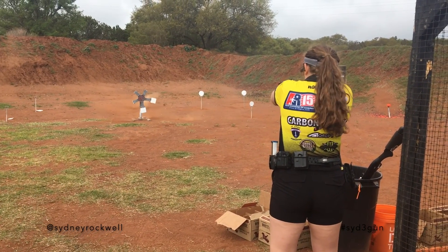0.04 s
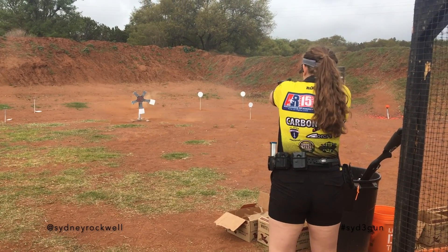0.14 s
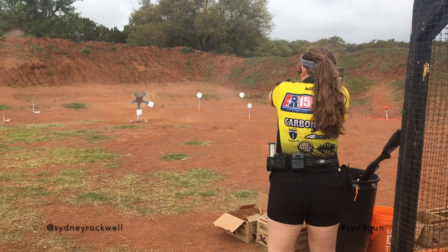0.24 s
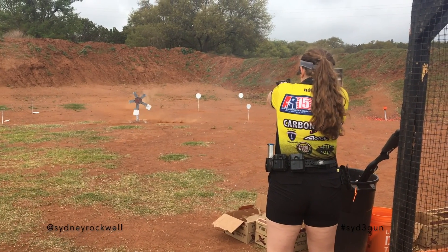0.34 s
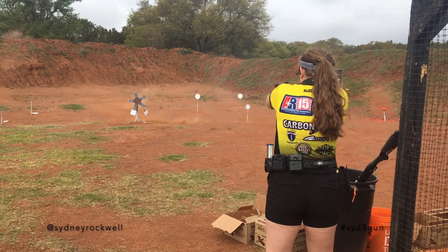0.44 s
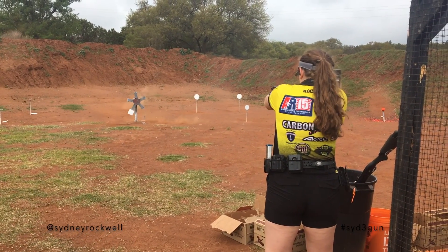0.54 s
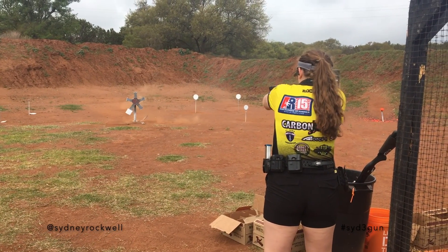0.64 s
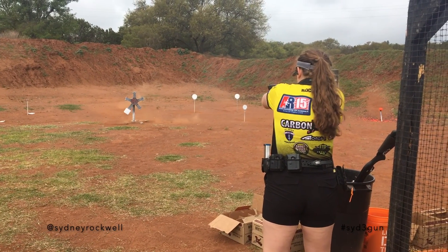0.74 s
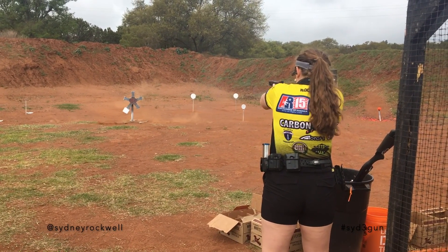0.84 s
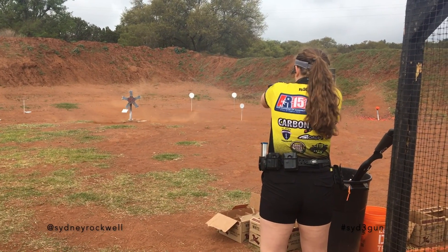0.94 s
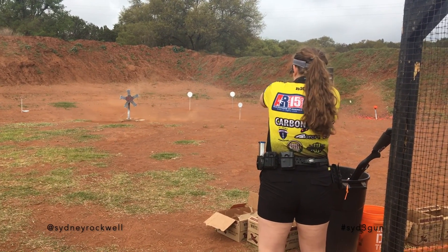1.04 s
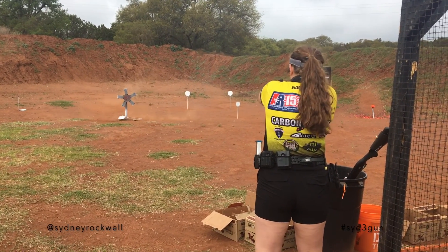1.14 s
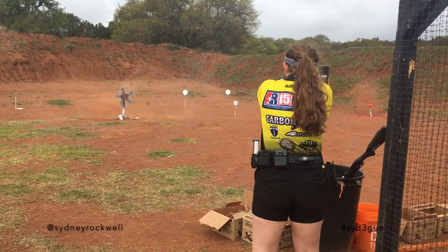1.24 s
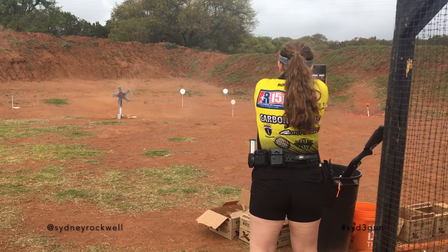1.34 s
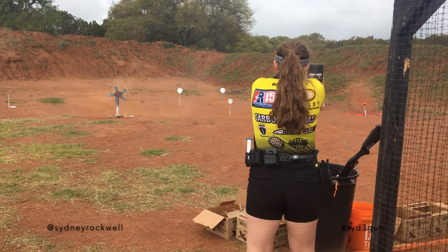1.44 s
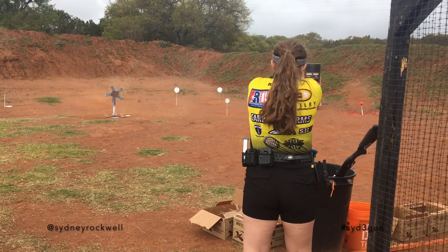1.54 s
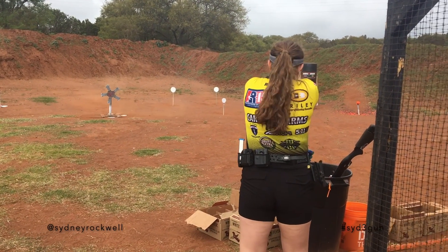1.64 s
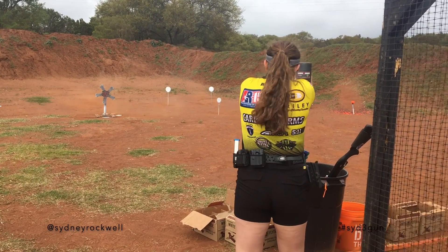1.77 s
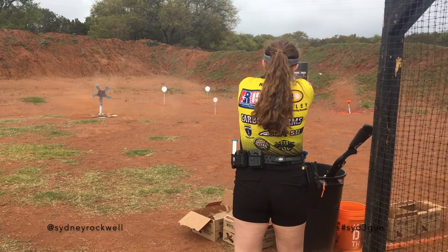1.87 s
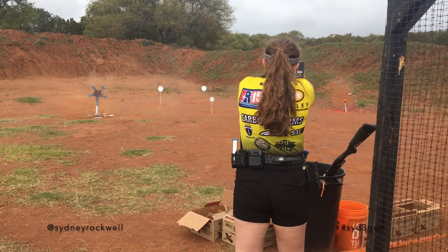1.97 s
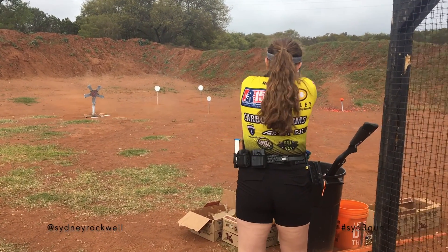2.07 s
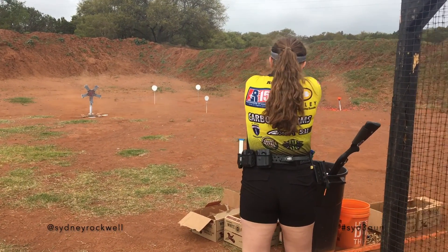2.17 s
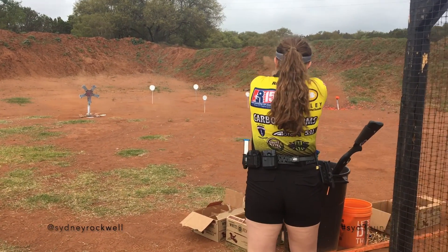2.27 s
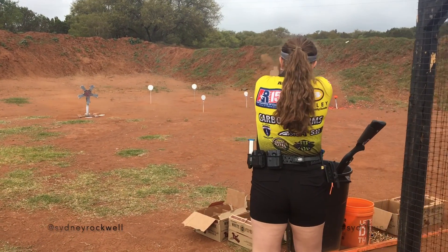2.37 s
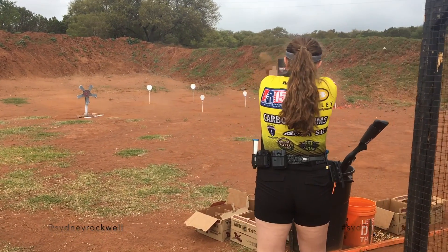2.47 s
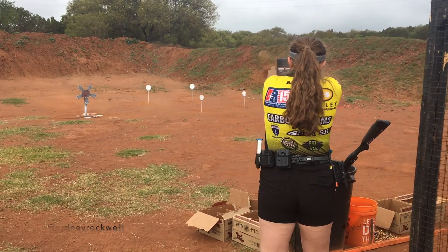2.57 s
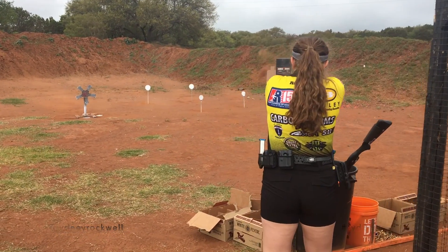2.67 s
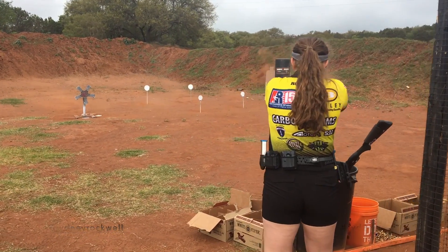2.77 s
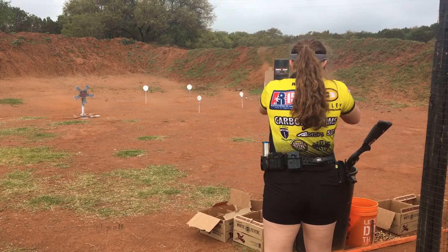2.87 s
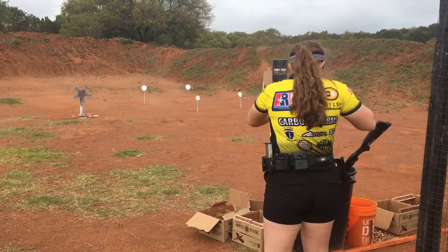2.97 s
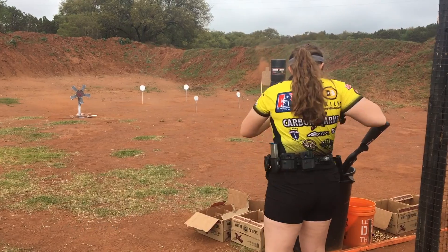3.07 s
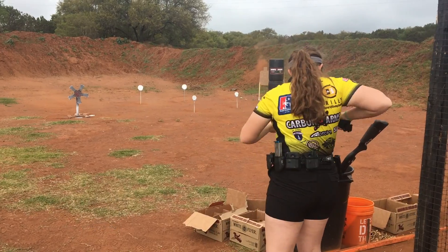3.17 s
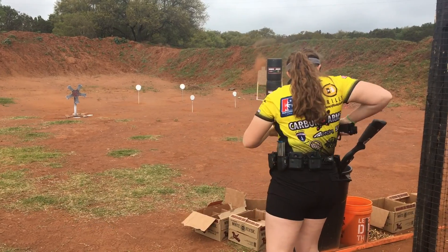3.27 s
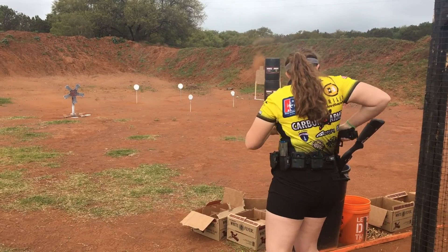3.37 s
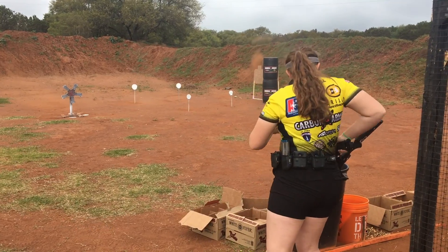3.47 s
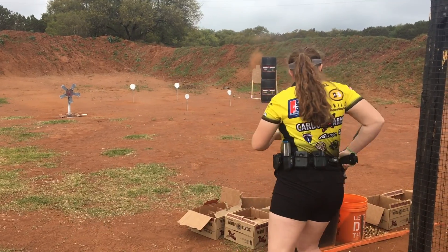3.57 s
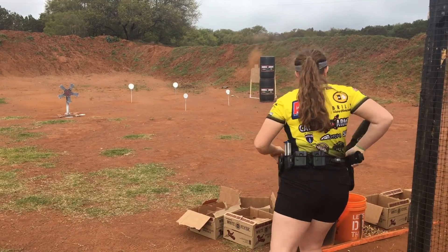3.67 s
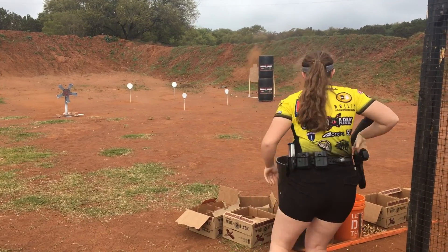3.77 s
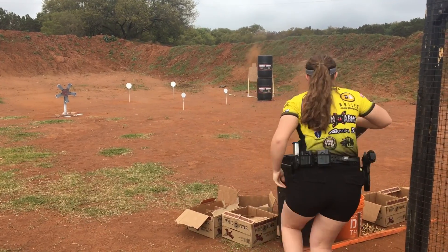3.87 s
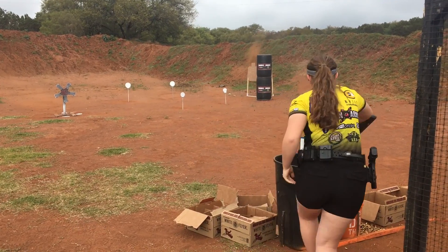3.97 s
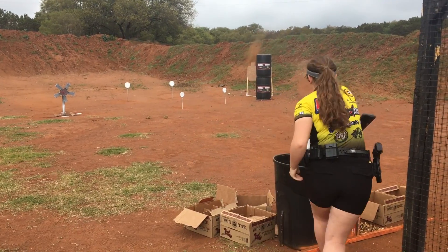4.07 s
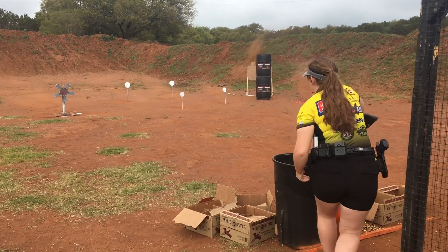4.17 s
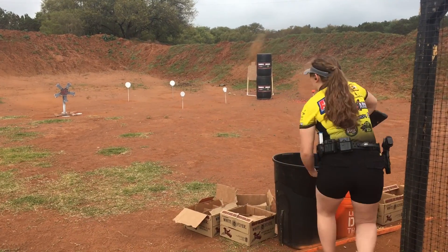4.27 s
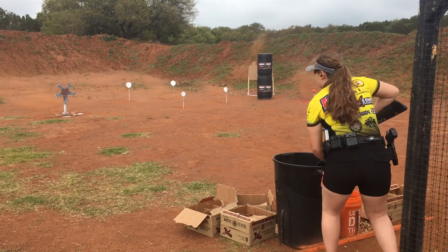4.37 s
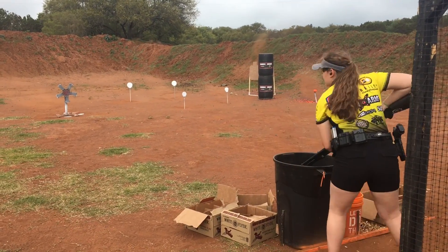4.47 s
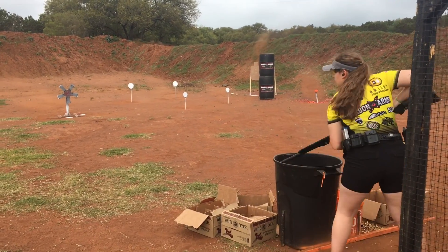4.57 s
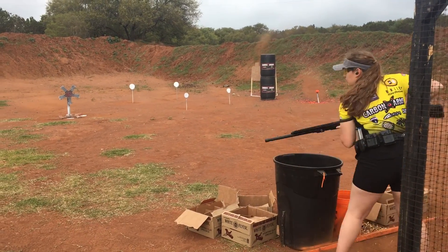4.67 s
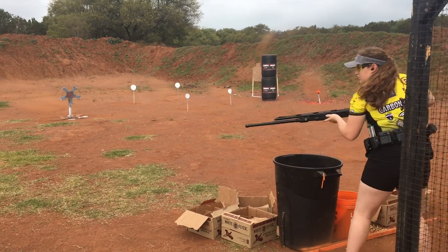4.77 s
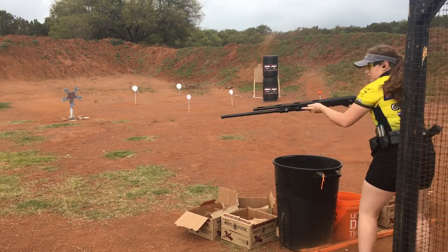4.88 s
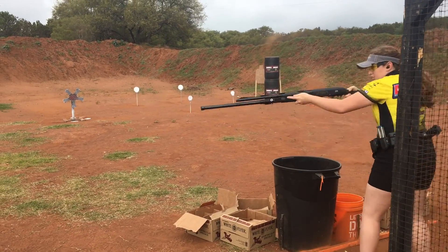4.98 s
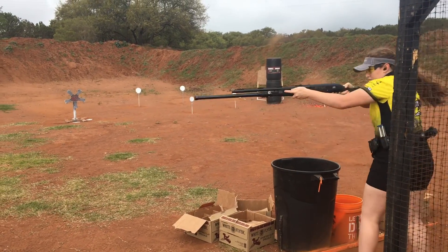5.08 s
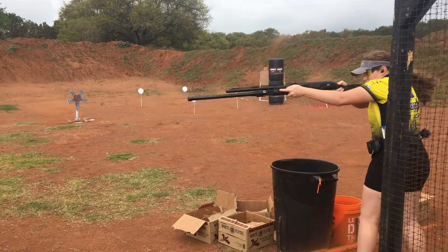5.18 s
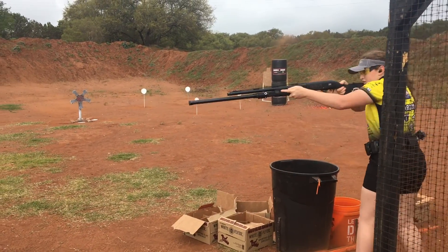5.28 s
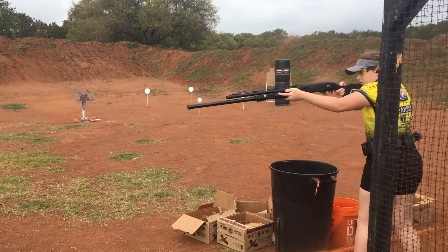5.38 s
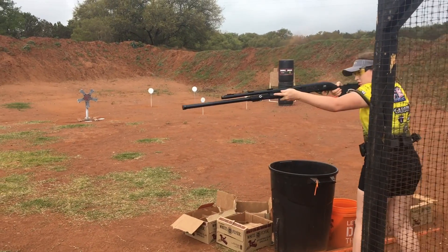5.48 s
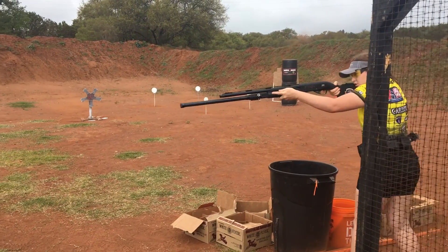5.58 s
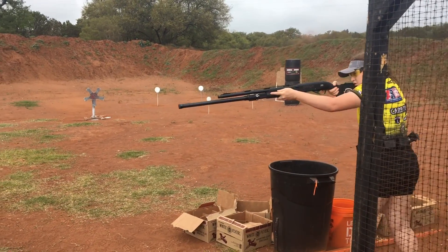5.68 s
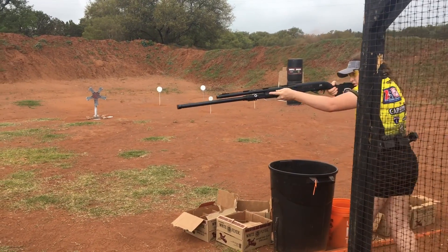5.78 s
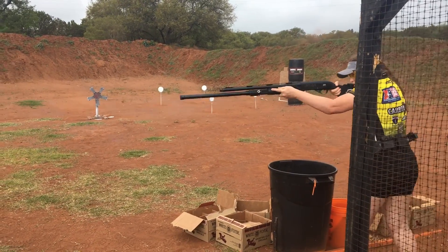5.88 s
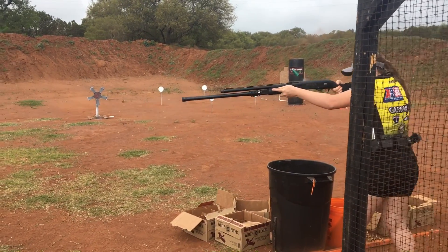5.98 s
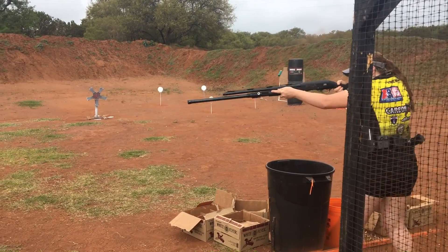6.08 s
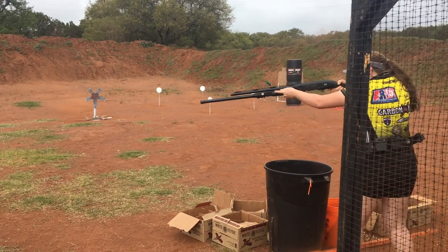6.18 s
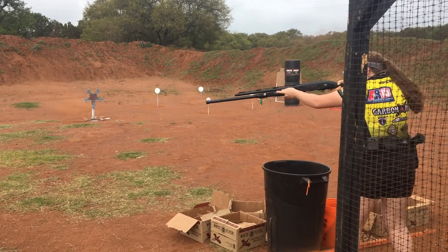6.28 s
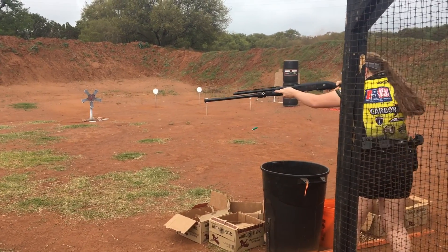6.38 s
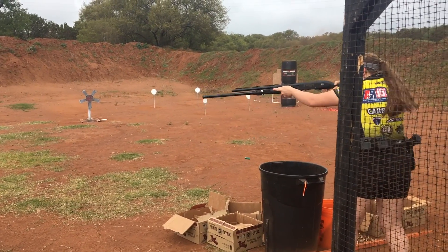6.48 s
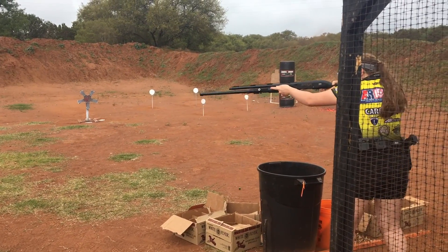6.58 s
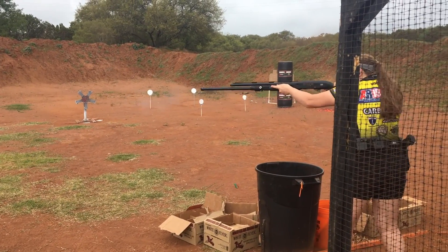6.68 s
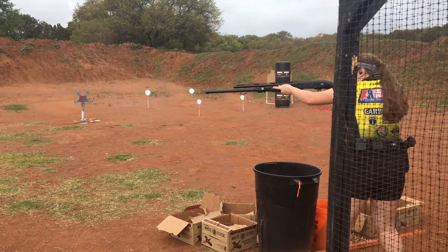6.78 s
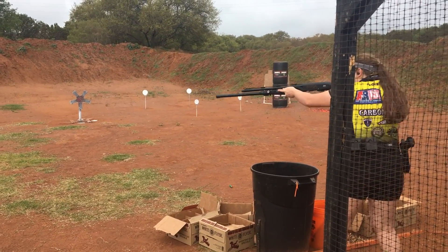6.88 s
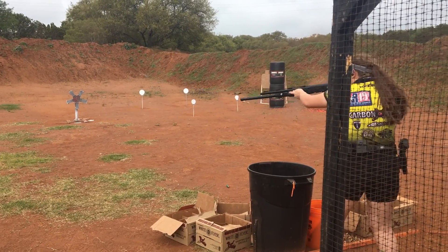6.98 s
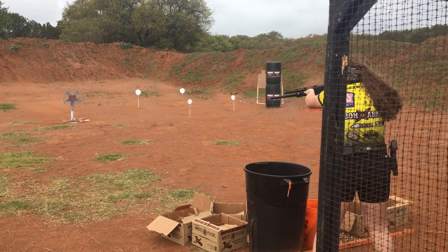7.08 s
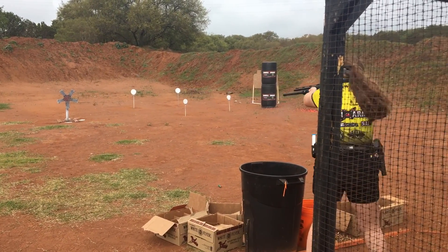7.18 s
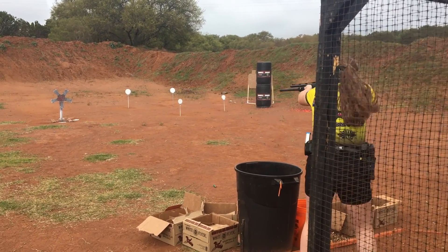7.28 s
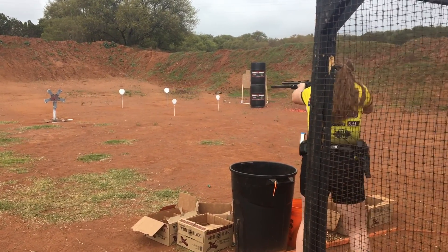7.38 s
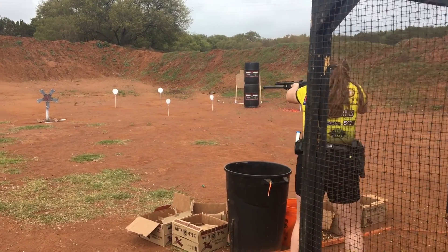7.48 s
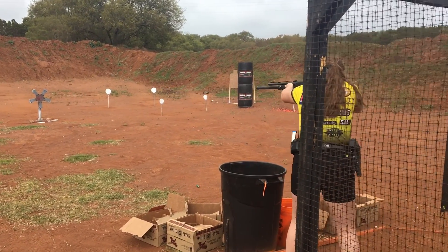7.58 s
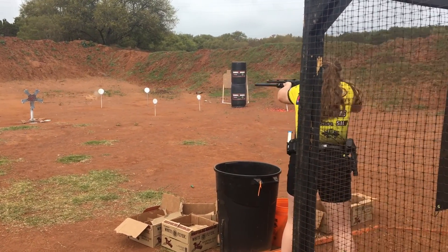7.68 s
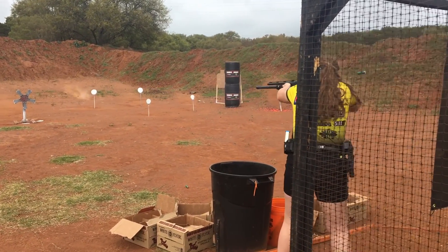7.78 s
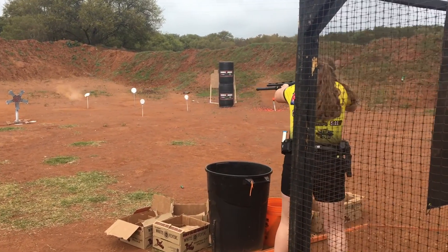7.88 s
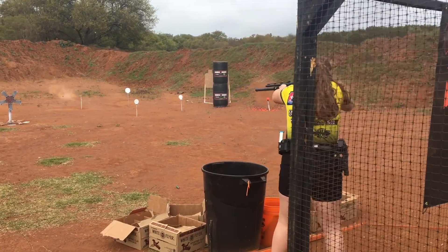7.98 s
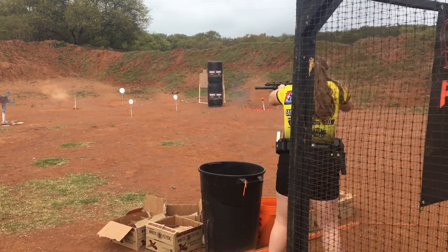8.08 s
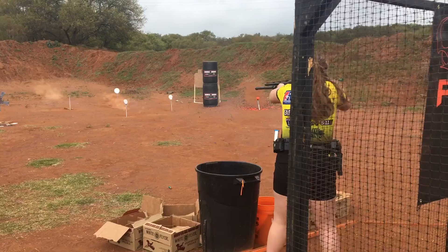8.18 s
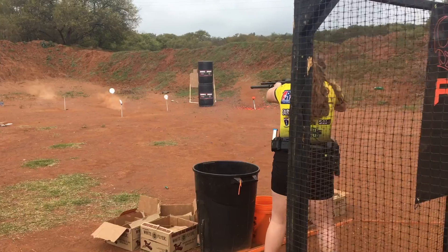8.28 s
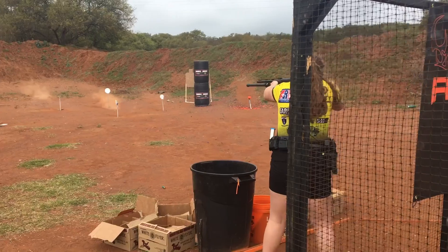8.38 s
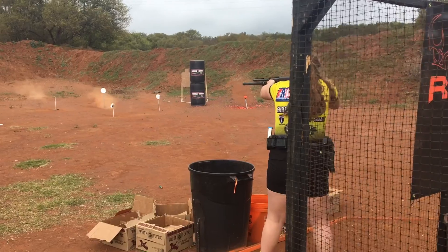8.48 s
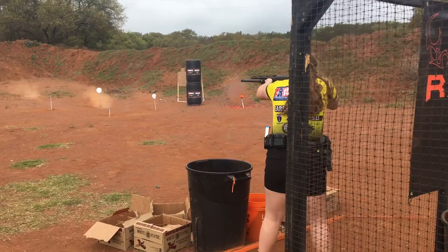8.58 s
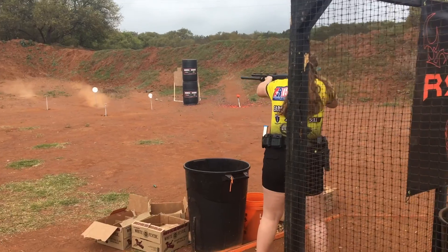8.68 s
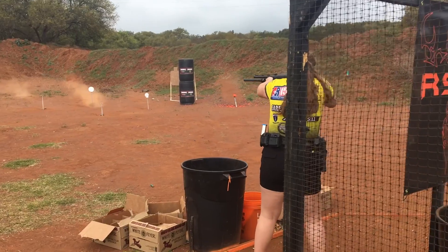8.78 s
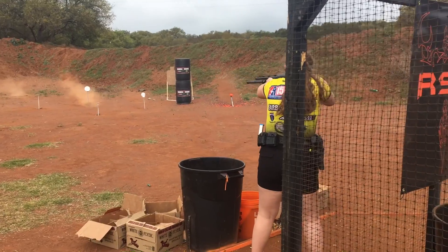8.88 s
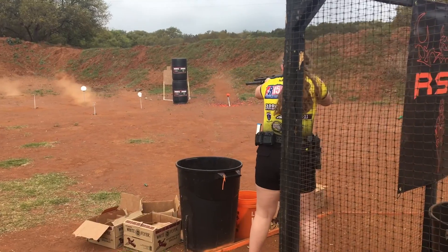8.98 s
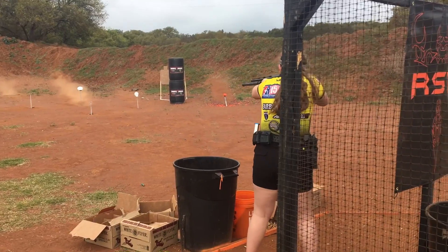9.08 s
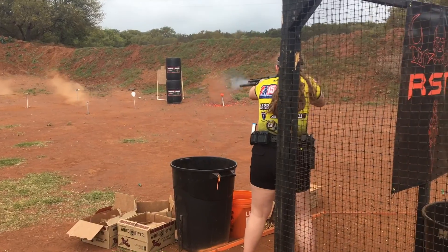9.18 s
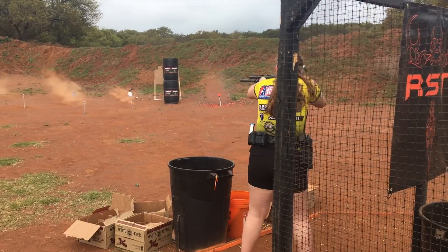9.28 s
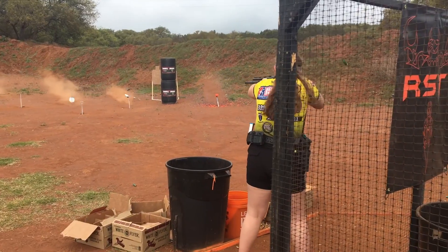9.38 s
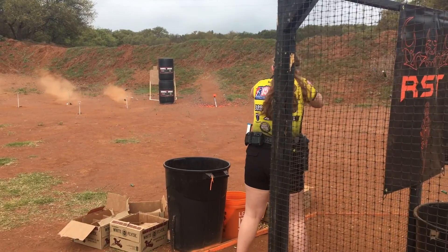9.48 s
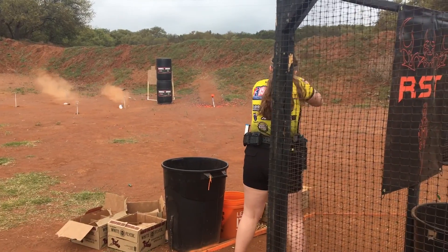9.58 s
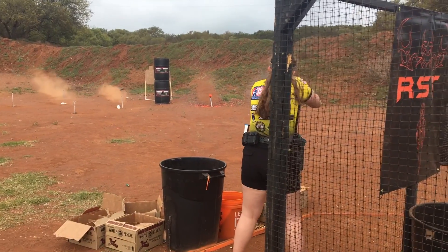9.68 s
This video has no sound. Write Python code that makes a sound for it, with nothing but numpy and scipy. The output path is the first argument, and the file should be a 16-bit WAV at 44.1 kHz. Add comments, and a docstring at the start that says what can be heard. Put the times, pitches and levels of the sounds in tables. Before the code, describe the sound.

An open-air shooting range, heard close behind the shooter, with a faint airy hush. The tail of an earlier shot opens it. Loud pistol cracks come at 0.3, 0.8, 1.8, 2.25 and 2.6 seconds, each with a quick echo off earth banks. Steel rings brightly at 0.4 and longer at 0.9, the plate clacking down around 1.2 to 1.35. From 3.4 to 4.7 gear clatters at a hollow plastic barrel, sharpest near 3.57, with deep knocks at 4.35 and 4.66. Muffled next-bay shots boom around 3.5, 4.0, 4.7, 5.2, 5.5 and 7.5; distant automatic fire thuds in strings at 1.2, 3 to 5.8, 6.3 and 7.2. Shotgun blasts hit at 5.9, 6.7, 7.7, 8.1, 8.6 and 9.25, with action clacks, short steel strikes from 6.8 onward, small pings and heavier rolling echoes.

```python
"""Pistol shots, then shotgun blasts, crack close by at an outdoor range with earth banks that answer them.
Steel plates ring as sums of fading sine tones; gear handled at a plastic barrel clacks as shaped noise.
Single shots boom in the next bay, strings of automatic fire thud far away, and a faint open-air hush
lies under it all. Roars and echoes are filtered noise; booms and thuds are low sine tones."""
import sys
import numpy as np
from scipy.fft import rfft, irfft, next_fast_len
from scipy.io import wavfile
from scipy.ndimage import uniform_filter1d, map_coordinates

SR = 44100
rng = np.random.default_rng(int(sys.argv[2]) if len(sys.argv) > 2 else 0)


def store_wav(level_fs):
    """Save 16-bit WAV to argv[1]."""
    pcm = np.round(np.clip(np.atleast_2d(level_fs), -1, 1) * 32767)
    wavfile.write(sys.argv[1], SR, pcm.T.astype(np.int16))


N = 429082  # length of the scene in samples

# near shots: (time [s], roar level [dB], boom level [dB], boom pitch [Hz], extra hold [s],
# near echoes over the roar [dB], far echoes over the roar [dB], rumble over the roar [dB])
SHOTS = [(-.235, -25.5, -12, 65, 0.001, 6, -3, -35.5), (0.301, -19.5, -8, 62.85, 0.0015, -1.5, -5, -42),
         (0.83, -18, -10, 66.4, 0.0011, -5, -6.5, -37.5), (1.788, -19.5, -13.5, 54.6, .014, -7, -5, -40),
         (2.256, -21, -27, 63.3, 0.0016, -5, -5, -33), (2.58, -20.5, -28, 63.5, 0.001, -3.5, -9, -30),
         (5.888, -17, -13.5, 57.3, .016, -11.5, -6, -38), (6.697, -18.5, -18, 95.6, 0.001, -1, -7.5, -22.5),
         (7.67, -17, -11.5, 67.6, 0.008, 1, 1, -16.5), (8.106, -18.5, -15, 69.6, 0.001, -2, 2.5, -19),
         (8.622, -18.5, -12.5, 75.2, 0.0032, 0.5, 1.5, -15.5),
         (9.243, -18.5, -18, 78, 0.0041, 0.5, -3, -19.5)]


def amp(db):
    """Turns decibels into a plain multiplier."""
    return 10 ** (np.asarray(db) / 20)


def along(points, hz):
    """Reads a curve of (Hz, value) points, spaced by pitch (log frequency)."""
    f, v = np.transpose(points)
    return np.interp(np.log(hz + 1), np.log(f + 1), v)


def noise(gain, seconds):
    """Noise of rms 1 whose strength at each frequency follows gain(Hz)."""
    length = round(seconds * SR)
    m = next_fast_len(length)
    spectrum = rfft(rng.standard_normal(m)) * gain(np.fft.rfftfreq(m, 1 / SR))
    x = irfft(spectrum, m)[:length]
    return x / np.std(x)


def ring(t, hz, t60, attack):
    """A sine that starts at t = 0, swells over about attack seconds and fades 60 dB in t60 seconds."""
    t = np.maximum(t, 0)
    return np.sin(2 * np.pi * hz * t) * amp(-60 * t / t60) * (1 - np.exp(-t / attack))


def lumps(rate, depth_db):
    """One second of gain that wanders at random, with rate random points a second."""
    points = rng.standard_normal(int(rate) + 4)
    return amp(depth_db * map_coordinates(points, [np.arange(SR) * int(rate) / SR]))


def arrivals(t, rows):
    """Gain for each level column: a sum of peaks that rise and fall by 60 dB in the given times."""
    total = 0
    for s, rise, fall, *db in rows:
        distance = np.where(t < s, (s - t) / rise, (t - s) / fall)
        total = total + amp(np.c_[db] - 60 * distance)
    return total


def add(track, s, sound):
    """Mixes a sound into the track at second s, cutting whatever falls outside."""
    at = round(s * SR)
    part = sound[max(-at, 0):][:N - max(at, 0)]
    track[max(at, 0):][:len(part)] += part


def shots():
    """The blast roars in several arrivals with a short low boom; then the banks scatter echoes and rumble."""
    # ways the blast arrives: direct, off the ground, off the shelter, scattered close by:
    # (time after the crack [s], 60 dB rise [s], 60 dB fall [s], mids level [dB], treble level [dB])
    blast = [(0, 0.05, .09, -2, -3), (.012, .04, .07, 0.5, 0), (.031, .025, .018, -4.5, -2),
             (.088, 0.41, .055, -19.5, -17)]
    # echoes off the side banks, then off the end banks; same columns as the blast
    near_banks = [(0.084, 0.205, 0.062, -11.5, -17.5), (0.104, 0.303, 0.63, -25.5, -24.5)]
    far_banks = [(.24, 0.087, .25, -28.5, -29), (0.303, 0.25, 0.44, -28, -31)]
    # tone of the roar's mids, of its treble, and of the echoes' mids: (frequency [Hz], relative level [dB])
    mids_tone = [(76, -30.5), (130, -2.5), (337, -13.5), (581, -5.5), (874, -8.5), (1880, -16),
                 (3250, -26.5), (5500, -120)]
    treble_tone = [(1060, -13.5), (1800, -2.5), (6350, -10.5), (10300, -16), (15900, -22), (16500, -46.5)]
    echo_tone = [(60, -17), (150, -12.5), (600, -3.5), (1100, -3.5), (2500, -20.5), (4000, -43.5)]
    air_db = -3.5  # treble change of the echoes at 10 kHz, growing with frequency

    def mids(hz):
        return amp(along(mids_tone, hz))

    def treble(hz):
        return amp(along(treble_tone, hz))

    def echo_mids(hz):
        return amp(along(echo_tone, hz))

    def echo_treble(hz):
        return treble(hz) * amp(air_db * hz / 10000)

    def low_mids(hz):
        return (hz / (260 + hz * hz / 260)) ** 3  # a broad hump at 260 Hz

    out = np.zeros(N)
    t = np.arange(SR) / SR - .03  # starts just ahead of the crack
    near = arrivals(t, near_banks) * (t > 0)
    far = arrivals(t, far_banks)
    fade_in = np.clip((t + 0.019) / 0.0078, 0, 1)
    for s, db, boom_db, boom_hz, hold, near_db, far_db, rumble_db in SHOTS:
        # a bigger charge stays loud for longer and sounds fuller
        held = t - np.clip(t, 0, hold)
        full = noise(mids, 1) + 40 * hold * noise(low_mids, 1)
        roar = arrivals(held, blast)[0] * fade_in * full
        # its treble comes later, all at once, and is weaker
        late = np.minimum(t - 0.39 * hold, np.maximum(held, 0))
        treble_gain = arrivals(late, blast)[1] * (late >= 0) * amp(-110 * hold)
        roar += treble_gain * noise(treble, 1)

        # uneven ground and trees return the mids in separate lumps
        banks = amp(near_db) * near + amp(far_db) * far
        echo = banks[0] * noise(echo_mids, 1) * lumps(90, 4)
        echo += banks[1] * noise(echo_treble, 1) * lumps(150, 0.66)
        rumble_gain = amp(rumble_db - 60 * np.abs(t - .15) / 0.45) * (t > 0)
        echo += rumble_gain * noise(low_mids, 1) * lumps(50, 2.5)
        # one clear slap off the far bank
        echo += amp(rumble_db - ((t - .297) / 0.0024) ** 2) * noise(echo_mids, 1)

        boom = np.sin(2 * np.pi * boom_hz * (t - .011)) * np.exp(-((held - .02) / 0.0092) ** 2)
        add(out, s + t[0], amp(db) * (roar * lumps(400, 2.4) + echo) + amp(boom_db) * boom)
    return out


def plates():
    """A struck steel plate cracks, then rings at its own pitches, which flutter as the plate swings."""
    # strikes, the second plate falling and bouncing:
    # (time [s], level [dB], tilt around 4 kHz [dB per octave], attack [s])
    hits = [(.368, -23, -1.1, 0.00085), (.900, -30.5, 7.5, 0.0065), (1.228, -56, -18, 0.048)]
    # which plate each strike meets: (plate index)
    struck = [0, 1, 1]
    # ringing tones of two steel plates, one list each: (frequency [Hz], level [dB], 60 dB fade [s])
    plate_tones = [
        [(2213, -10.5, 0.9), (2517, 0, 0.71), (3450, -11, .8), (5715, -1, 0.59), (8300, -10.5, 0.32),
         (10555, -5, 0.5), (11044, -5, .4), (12540, -13, .3)],
        [(1035, -11, 1.4), (1351, -24, 1.2), (2216, -2, 1.8), (2219, -2, 1.8), (2540, -3, 1.2), (3386, 0, .7),
         (3451, 1, 0.6), (6080, -21.5, 1.3), (4620, -20, 0.97), (5750, -10, 0.55), (6907, -13, 0.52),
         (8270, -15, 0.3)],
    ]
    landed_s = 1.378  # the loose plates come to rest in the dirt, which damps them
    out, t = np.zeros(N), np.arange(SR) / SR

    def pair(hz, t60, attack):
        """Two tones very close in pitch, which beat against each other."""
        partner_hz = hz * (1 + rng.uniform(.003, .009))
        partner_gain = .4 * min(hz / 3000, 1)
        return ring(t, hz, t60, attack) + partner_gain * ring(t, partner_hz, t60, attack)

    for (s, db, tilt_db, attack), which in zip(hits, struck):
        dirt_time = np.maximum(s + t - landed_s, 0)
        tones = np.zeros(len(t))
        for hz, level, t60 in plate_tones[which]:
            tone_db = level + tilt_db * np.log2(hz / 4000) - hz / 15 * dirt_time
            swing_db = 4.5 * np.minimum(t / .15, 1) * min(hz / 3000, 1)  # low tones flutter less
            tones += amp(tone_db) * lumps(25, swing_db) * pair(hz, t60, attack)
        # many faint upper tones shimmer
        for hz in rng.uniform(6000, 15500, 12):
            tones += amp(-22 - 300 * attack) * pair(hz, .3, attack)
        # softer contact, weaker crack
        crack = amp(7 - 300 * attack - 60 * t / 0.022) * rng.standard_normal(len(t))
        add(out, s, amp(db) * (tones + crack))
    return out


def pings():
    """Small plates hit by shot charges ring briefly, their low tones longest."""
    # plates rung: (time [s], tones as a list of (frequency [Hz], level [dB]))
    small_plates = [(7.76, [(7553, -45), (11150, -42)]), (8.186, [(6584, -45.5)]), (9.322, [(3515, -52.5),
                    (4226, -56), (6309, -53), (7946, -39), (8656, -37.5), (13300, -40)])]
    out, t = np.zeros(N), np.arange(SR) / SR
    for s, modes in small_plates:
        for hz, db in modes:
            t60 = .4 * (8000 / hz) ** 2  # four times as long an octave lower
            add(out, s, amp(db) * lumps(25, 1.5) * ring(t, hz, t60, .004))
    return out


def clack(track, s, body_db, centre_hz, tick_db, hollow_db=0):
    """A short clack: a bright tick, and noise ringing in two broad resonances with a rattling level."""
    t = np.arange(SR // 4) / SR
    tick_t60, body_t60 = 0.03, 0.07  # s
    overtone, hollow_hz = 1.55, 750  # second resonance over the first; spacing of a hollow's resonances [Hz]

    def tick_tone(hz):
        return hz / (2500 + hz * hz / 2500)

    def peak(hz, middle_hz):
        return 1 / (1 + ((hz - middle_hz) / (0.2 * middle_hz)) ** 2)

    def body_tone(hz):
        resonances = peak(hz, centre_hz) + 0.7 * peak(hz, overtone * centre_hz)
        return resonances * amp(hollow_db * np.cos(2 * np.pi * hz / hollow_hz))

    tick = amp(tick_db - 60 * t / tick_t60) * noise(tick_tone, 1 / 4)
    body = amp(body_db - 60 * t / body_t60) * noise(body_tone, 1 / 4)
    add(track, s, tick + body * lumps(180, 1.7)[:len(t)])


def knock(track, s, db, hz, t60):
    """A dull knock: one low sine that fades quickly."""
    t = np.arange(SR // 4) / SR
    add(track, s, amp(db) * ring(t, hz, t60, 0.00074))


def shot_charges():
    """The gun's action slams, then the charge strikes steel, knocks the stand and may splash off as lead."""
    # charges striking steel: (strike time [s], strike level [dB], action level [dB])
    charges = [(6.772, -30, -37.5), (7.756, -21, -24), (8.184, -26.5, -28.5), (8.704, -27, -32),
               (9.322, -24, -40)]
    out = np.zeros(N)
    for s, strike_db, action_db in charges:
        clack(out, s - .022, action_db, 1500, action_db + 8)
        clack(out, s, strike_db, 634, strike_db + 5)
        knock(out, s - .003, strike_db + 9.5, 190, 0.053)  # the stand
    for s, strike_db, _ in charges[1:4]:
        clack(out, s + 0.015, strike_db - 11.5, 7000, strike_db)  # lead splashing off the plate
    return out


def clacks():
    """Short noise bursts: falling plates, cases, the action, two dull far echoes, and gear at the barrel."""
    # falling plates, cases and the action; also dull far echoes of two shotgun blasts at 7.036 and 8.435 s:
    # (time [s], body level [dB], body centre [Hz], tick level [dB])
    clacks_and_echoes = [(1.181, -34, 1400, -57.5), (1.244, -37.5, 2266, -57), (1.334, -44.5, 3470, -40),
                         (1.592, -43, 900, -61), (4.661, -46, 3020, -39.5), (6.033, -41, 6700, -39),
                         (7.036, -41.5, 680, -59), (8.172, -36, 6000, -25), (8.435, -31.5, 820, -46)]
    # gear handled at the hollow barrel and holster; same columns
    handled_gear = [(3.387, -40, 1500, -49.5), (3.415, -50, 1600, -62.5), (3.468, -43.5, 1510, -50),
                    (3.55, -36, 1500, -38), (3.573, -25, 1120, -22.5), (3.604, -43, 1450, -45.5),
                    (3.731, -35, 2020, -46), (4.211, -40, 1050, -54.5), (4.313, -36, 997, -52),
                    (4.33, -33, 724, -50.5), (4.367, -38.5, 2320, -49), (4.38, -35.5, 1290, -52),
                    (4.544, -54, 1970, -45.5), (4.68, -32, 620, -39.5)]
    out = np.zeros(N)
    for row in clacks_and_echoes:
        clack(out, *row)
    for row in handled_gear:
        clack(out, *row, hollow_db=3)
    return out


def knocks():
    """The barrel and gear set down give dull ringing knocks."""
    # knocks: (time [s], level [dB], frequency [Hz], 60 dB fade [s])
    set_down = [(4.332, -14.5, 134.4, 0.14), (4.38, -18, 125, 0.066), (4.664, -22, 228, 0.067),
                (9.586, -29, 104, 0.05)]
    out = np.zeros(N)
    for row in set_down:
        knock(out, *row)
    return out


def next_bay():
    """Shots behind a bank: a dull crack, a low boom that returns off the bank, and a rolling noise tail."""
    # shots in the next bay: (time [s], crack and tail level [dB], boom level [dB])
    bay_shots = [(3.487, -25, -28.5), (4.043, -23.5, -31), (4.661, -31, -22.5), (5.241, -22.5, -15.5),
                 (5.468, -26.5, -19.5), (7.471, -30, -22)]
    # tone of the tail: (frequency [Hz], relative level [dB])
    tail_tone = [(150, -32), (250, -1), (525, -5), (995, -6), (2120, -11.5), (8880, -30.5), (14000, -47.5)]
    # how each shot arrives: crack, roll, nearer bank, far bank:
    # (time after the shot [s], 60 dB rise [s], 60 dB fall [s], level [dB])
    roll_arrivals = [(0, .001, 0.039, -12.5), (.001, 0.00091, 0.39, -16), (.135, .12, .4, -26),
                     (.3, 1, 0.77, -29)]
    out, t = np.zeros(N), np.arange(SR) / SR

    def boom(t):
        return ring(t, 92.4, 0.099, 0.00059)

    booms = boom(t - .004) + amp(-11.5) * boom(t - 0.077)  # direct, then off the nearer bank
    crack = 2.0 * ring(t, 570, 0.012, 0.00017)
    for s, db, boom_db in bay_shots:
        roll = noise(lambda hz: amp(along(tail_tone, hz)), 1)
        # lows and highs come back in lumps of their own
        lows = uniform_filter1d(roll, size=25)
        highs = roll - lows
        tail = arrivals(t, roll_arrivals)[0] * (lows * lumps(80, 3.2) + highs * lumps(200, 2.4))
        add(out, s, amp(db) * (tail + crack) + amp(boom_db) * booms)
    return out


def automatic_fire():
    """Only the bass of the far rounds arrives, once direct and once off a bank; no two are quite alike."""
    # strings of fire: (first round [s], last round [s], full level [dB])
    strings = [(1.158, 1.719, -31), (2.974, 3.808, -31.5), (4.103, 5.836, -30.5), (6.326, 6.61, -37.5),
               (7.178, 7.364, -34)]
    # low tones of one round: (frequency [Hz], level [dB], 60 dB fade [s]), the first two varied at random
    thud_tones = [(76, 3.5, 0.13), (187.4, -3.5, 0.11)]
    round_s = .095  # roughly the time from round to round
    # after a near shot the thuds are faint and swell back
    return_s, return_db_per_s = 0.86, 39.5
    out, t = np.zeros(N), np.arange(SR // 4) / SR

    def thud(t, u):
        total = 0
        for k, (hz, db, t60) in enumerate(thud_tones):
            varied_hz = hz * (1 + .07 * u[k + 2])
            total = total + amp(db + 3.5 * u[k]) * ring(t, varied_hz, t60, 0.0073)
        return total

    for first, last, db in strings:
        rounds = np.linspace(first, last, round((last - first) / round_s) + 1)
        for s in rounds:
            u = rng.standard_normal(8)  # the chance differences of this round
            since = min(s - shot[0] for shot in SHOTS if shot[0] < s)
            level_db = db - return_db_per_s * max(return_s - since, 0)
            both = thud(t, u[:4]) + .5 * thud(t - .029, u[4:])
            add(out, s - .003 + .004 * u[3], amp(level_db) * both)
    return out


def air():
    """The open-air hush: faint filtered noise whose level slowly rises and sinks."""
    # tone of the hush: (frequency [Hz], relative level [dB])
    hush_tone = [(22, -29), (40, -4), (90, 2), (200, -11), (700, -11.5), (16000, -39)]
    # loudness of the hush: (time [s], level [dB])
    hush_level = [(0, -56.5), (3.099, -64), (5.8, -56.5), (6.399, -70), (7.604, -56.5), (9.73, -49)]
    level_db = np.interp(np.arange(N) / SR, *np.transpose(hush_level))
    return amp(level_db) * noise(lambda hz: amp(along(hush_tone, hz)), N / SR)


def scene():
    """Adds up all the sources into one channel."""
    steel = plates() + pings() + shot_charges()
    gear = clacks() + knocks()
    distance = next_bay() + automatic_fire() + air()
    return (shots() + steel + gear + distance)[None]


def record(dry):
    """Softly squashes the peaks, then removes everything from 16 kHz up."""
    soft = dry / (1 + np.abs(dry / .52) ** 5) ** (1 / 5)
    m = next_fast_len(N + SR // 2)
    kept = np.fft.rfftfreq(m, 1 / SR) < 16000
    return irfft(rfft(soft, m) * kept, m)[..., :N]


dry = scene()
out = record(dry)
store_wav(out)
```